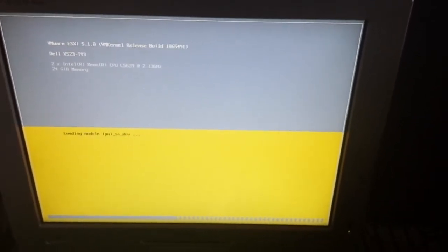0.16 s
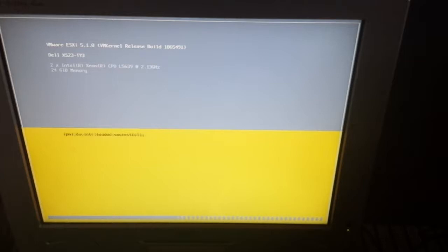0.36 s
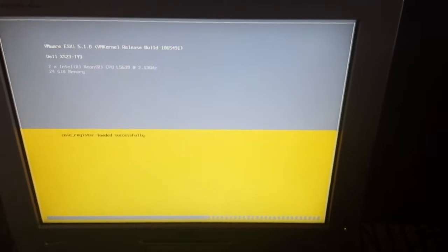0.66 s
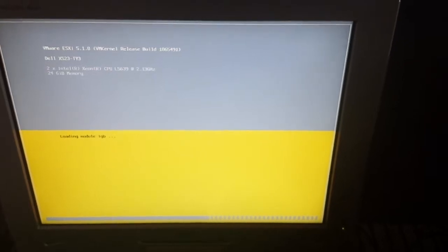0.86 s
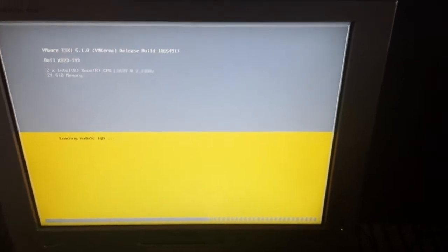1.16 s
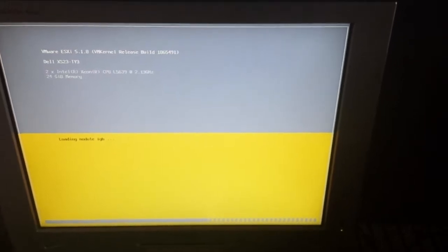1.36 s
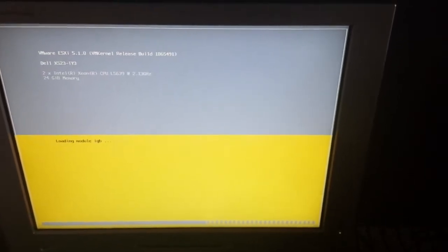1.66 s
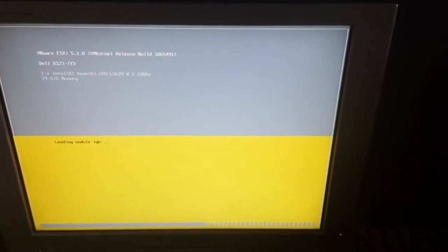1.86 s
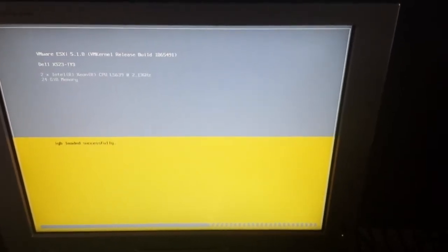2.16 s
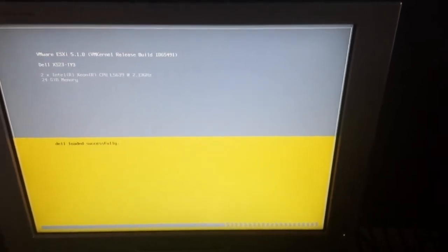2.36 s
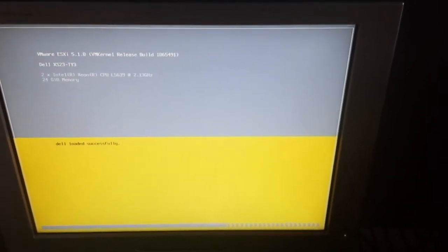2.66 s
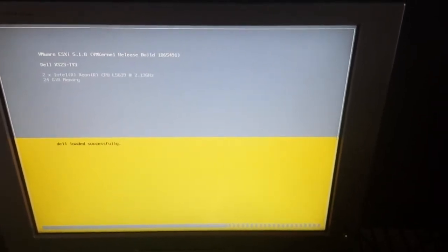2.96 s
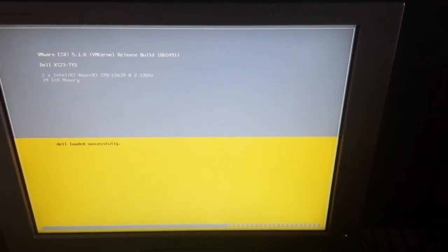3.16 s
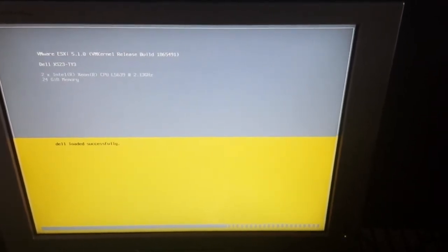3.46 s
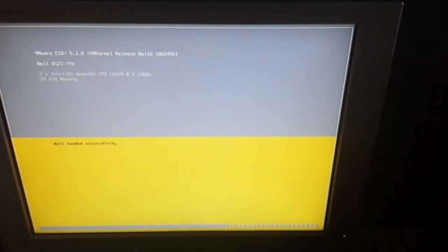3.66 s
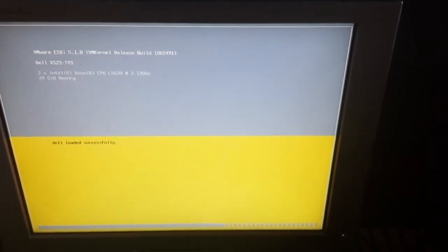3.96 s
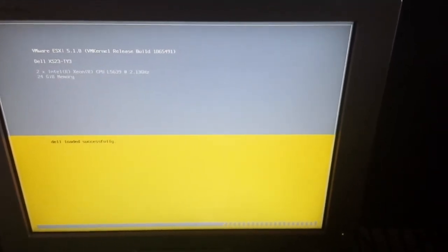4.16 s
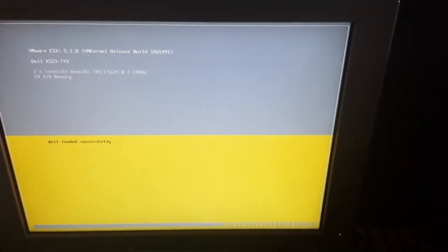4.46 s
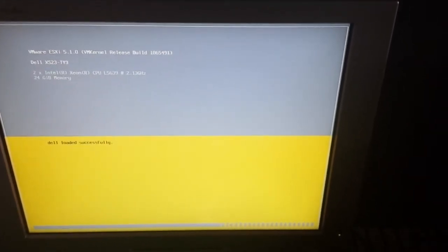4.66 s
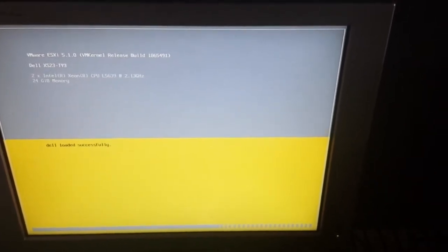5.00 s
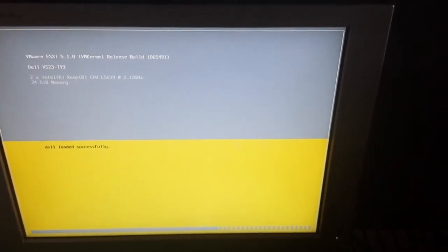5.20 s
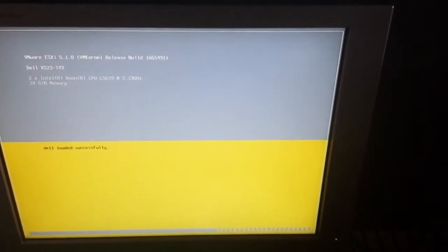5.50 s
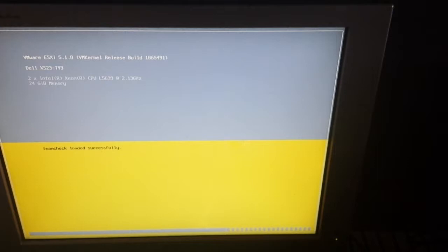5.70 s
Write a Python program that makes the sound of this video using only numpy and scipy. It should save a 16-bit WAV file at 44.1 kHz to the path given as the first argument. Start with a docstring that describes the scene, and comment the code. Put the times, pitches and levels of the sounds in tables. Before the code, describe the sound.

The cooling fans of a computer server blow a steady rush of air in a small room. A mid-pitched hum throbs about twice a second within it, with a fainter pulsing whine and thin tones above. A little before halfway the sound cuts out for an instant. It comes back slightly quieter, in mono instead of stereo, then swells to full and runs on.

```python
"""You hear a steady rush of air with a throbbing hum: a booting server's cooling fans in a small room.
The air rushes through the case, which rings at some pitches, and the blades add faint tones above it.
Two pairs of fans turn at nearly the same speed, so their tones beat (swell and sink) about two and
three times a second. The sound drops out briefly, comes back in mono from the left microphone alone,
and swells to full over a second."""
import sys
import numpy as np
from scipy import signal
from scipy.fft import rfft, irfft, next_fast_len
from scipy.io import wavfile

SR = 44100
rng = np.random.default_rng(int(sys.argv[2]) if len(sys.argv) > 2 else 0)


def int16_out(signal):
    """Quantize to a 16-bit WAV file."""
    q = np.round(np.clip(np.atleast_2d(signal).T, -1, 1) * 32767)
    wavfile.write(sys.argv[1], SR, q.astype(np.int16))


N = 257365
TIME = np.arange(N) / SR

# swirling air at the left microphone, before the resonances: pitch_hz, level_db_per_hz
AIR_SPECTRUM = [(25, -100), (55, -86), (100, -74), (150, -71), (300, -62.5), (480, -65.5), (700, -63.5),
                (1100, -67.5), (2000, -71), (2800, -72.5), (7150, -73.5), (7650, -82), (9200, -87),
                (10100, -98.5)]
# pitches that the case and room boost or weaken: pitch_hz, width_hz, boost_db
CASE_RESONANCES = [(225, 33, 2), (263.6, 16.3, -6.5), (299, 31, 3.5), (322.6, 14, -6.5), (356, 31, 7.5),
                   (388.7, 24.5, 7), (412, 33, 6), (472, 19, 1), (505, 22, 2), (523, 115, 7.5),
                   (595, 17, 3), (653, 67, -4.5), (710, 40, 1), (848, 35, 3.5), (1087, 88, 5.2),
                   (1190, 30, 4), (1355, 48, 1.5), (1473, 50, 4.5), (1612, 100, 6), (1735, 30, -4),
                   (1778, 87, 6), (2238, 130, 4.5), (3025, 130, 3.5), (3650, 230, 3), (4040, 130, 2.2),
                   (4460, 220, 2.5), (5430, 560, 3), (6085, 97, 4), (6360, 210, 5), (6600, 130, 2),
                   (6980, 220, -2), (7300, 260, 1)]
# how much louder the air is on the right than on the left: pitch_hz, right_boost_db
AIR_RIGHT_BOOST = [(60, 0), (200, 2.5), (450, -0.6), (750, 2), (950, 0.5), (1400, -1.5), (1700, 0),
                   (2200, 0.5), (4300, -0.5), (5200, -5.5), (6300, -8), (7200, -1), (8300, 8), (9100, 5.5),
                   (10000, 13.5)]
# how alike the air is at the two microphones: pitch_hz, likeness_0_to_1, left_lag_rad
AIR_LIKENESS = [(60, 0.9, -0.5), (200, 0.97, 0), (298, 0.92, 0.36), (368, 0.94, -0.5), (533, 0.85, 1),
                (690, 0.5, 0.1), (1000, 0.6, 0.14), (1180, 0, 2.5), (1650, 0.73, 2.5), (1925, 0.43, 3.5),
                (2130, 0.1, 3.5), (2960, 0.05, 1.5), (3690, 0.05, 8), (5000, 0.2, 5.5), (10000, 0, 19)]
# steady blade and motor tones: pitch_hz, level_db, right_boost_db, left_lag_rad
FAN_TONES = [(83, -63.5, -1, 0), (236.9, -55.5, 6.5, .1), (319.5, -52, 2, .3), (551.4, -50, 1, .6),
             (639, -52, 4, .1), (1103, -57, -1, .7), (1114.5, -53.5, -3, .7), (1118.5, -57, -1, .7),
             (1274.3, -44.3, 0, -1.2), (1654, -54, -6, 3), (1672.6, -49.5, -5, 3), (2185, -58, -3, 3.2)]
# two beating pairs of fans, a hum and a fainter whine; at a lull their tones nearly cancel:
# pitch_hz, (lull_s, beats_per_s) before the gap, (lull_s, beats_per_s) after it
FAN_PAIR_BEATS = [(558.4, (.148, 1.91), (2.616, 1.812)), (957.25, (.31, 3.25), (2.655, 3.15))]
# the same two pairs: faster_fan_db, slower_fan_offset_db, right_boost_db, left_lag_rad
FAN_PAIR_LEVELS = [(-36, -0.5, -1.5, 0.43), (-45.5, -3, -1, 0.72)]
# moments when the hum's faster fan sounds louder: peak_s, half_length_s, boost_db
HUM_FLARE_UPS = [(2.845, 0.026, 8.5), (3.101, 0.014, 12.5), (5.146, 0.022, 6.5), (5.607, 0.056, 5.5)]

GAP_START_S, GAP_END_S = 2.292, 2.425


def from_db(db):
    """Turn decibels into a number to multiply a sound by."""
    return 10 ** (np.asarray(db) / 20)


def at_hz(rows, hz, column=1):
    """Read a table between its rows, along straight lines on a log pitch scale."""
    rows = np.array(rows)
    return np.interp(np.log(hz + 1e-9), np.log(rows[:, 0]), rows[:, column])


def drift(rate_hz):
    """A smooth random wobble, about 1 in size, that changes roughly rate_hz times a second."""
    step, warm_up = 40, 2000  # samples per point, points thrown away
    pole = np.exp(-2 * np.pi * step * rate_hz / SR)
    noise = rng.standard_normal(N // step + warm_up + 2)
    slow = signal.lfilter([1], [1, -2 * pole, pole * pole], noise)[warm_up:]
    return np.interp(np.arange(N) / step, np.arange(len(slow)), slow / slow.std())


def rushing_air():
    """Swirling air rings the case and room. Long waves reach both microphones alike; short ones do not."""
    size = next_fast_len(N)
    hz = np.arange(size // 2 + 1) * SR / size
    boost_db = sum(db / (1 + (2 * (hz - centre) / width) ** 2) for centre, width, db in CASE_RESONANCES)
    colour = from_db(at_hz(AIR_SPECTRUM, hz) + boost_db) * np.sqrt(SR / 2)
    left, unrelated = rfft(rng.standard_normal((2, size)))
    likeness = np.clip(at_hz(AIR_LIKENESS, hz), 0, 1)
    lag_rad = at_hz(AIR_LIKENESS, hz, column=2)
    right = likeness * np.exp(1j * lag_rad) * left + np.sqrt(1 - likeness ** 2) * unrelated
    right *= from_db(at_hz(AIR_RIGHT_BOOST, hz))
    return irfft(colour * np.array([left, right]), size)[:, :N]


def blade_tone(phase, level_db, right_db, lag_rad):
    """One fan's pure tone at both microphones; level_db is its average (rms) level on the left."""
    peak = np.sqrt(2) * from_db(level_db)
    return peak * np.array([np.sin(phase), from_db(right_db) * np.sin(phase + lag_rad)])


def fan_whine(flutter_db=1.05, wander_rad=0.19):
    """Air enters the fans unevenly, so each faint tone flutters in level and wanders in phase."""
    out = np.zeros((2, N))
    for hz, level_db, right_db, lag_rad in FAN_TONES:
        phase = 2 * np.pi * (hz * TIME + rng.random()) + wander_rad * drift(1.6)
        out += blade_tone(phase, level_db + flutter_db * drift(3.9), right_db, lag_rad)
    return out


def beating_fans(flutter_db=0.5, rise_db_per_s=0.01):
    """In each pair one fan gains on the other, by one whole blade from each lull to the next."""
    out = np.zeros((2, N))
    for beats, levels, flare_db in zip(FAN_PAIR_BEATS, FAN_PAIR_LEVELS, (hum_flares(), 0)):
        hz, before_gap, after_gap = beats
        start_db, slower_offset_db, right_db, lag_rad = levels
        lull_s, beats_per_s = np.where((TIME < GAP_END_S)[:, None], before_gap, after_gap).T
        lead_rad = 2 * np.pi * beats_per_s * (TIME - lull_s) + np.pi  # opposite at each lull
        phase = 2 * np.pi * (hz * TIME + rng.random())
        level_db = start_db + rise_db_per_s * TIME
        faster_db = level_db + flare_db + flutter_db * drift(10.0)
        slower_db = level_db + slower_offset_db + flutter_db * drift(6.7)
        out += blade_tone(phase + lead_rad / 2, faster_db, right_db, lag_rad)
        out += blade_tone(phase - lead_rad / 2, slower_db, right_db, lag_rad)
    return out


def dropout_gain(drop_db=-21, tail_s=0.027):
    """At the gap the level drops at once, and a faint tail fades to silence."""
    tail = np.clip(1 - (TIME - GAP_START_S) / tail_s, 0, 1) ** 2
    return np.where(TIME < GAP_START_S, 1, from_db(drop_db) * tail)


def comeback_gain(fade_in_db=-8.5, fade_in_s=0.044, lowered_db=-3.0, hold_s=0.59, swell_s=0.4):
    """After the gap the level rises quickly, stays a little low, then swells to full."""
    since_s = np.maximum(TIME - GAP_END_S, 0)
    swell = np.clip((since_s - hold_s) / swell_s, 0, 1)
    return from_db(fade_in_db * np.exp(-since_s / fade_in_s) + lowered_db * (1 - swell))


def hum_flares():
    """The hum gets louder for a moment now and then: smooth bumps of extra level, in dB."""
    return sum(db * np.exp(-((TIME - peak_s) / half_s) ** 2) for peak_s, half_s, db in HUM_FLARE_UPS)


def scene():
    """Rushing air with the fans' tones in it."""
    return rushing_air() + fan_whine() + beating_fans()


def record(dry):
    """Stereo up to the gap, then the left microphone on both sides; the highest treble is cut."""
    heard = np.where(TIME < GAP_END_S, dry * dropout_gain(), dry[0] * comeback_gain())
    treble_cut = signal.cheby2(12, 62, 12100, fs=SR, output="sos")  # 62 dB down from 12100 Hz up
    return signal.sosfilt(treble_cut, heard)


dry = scene()
out = record(dry)
int16_out(out)
```